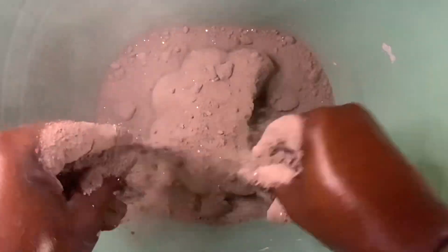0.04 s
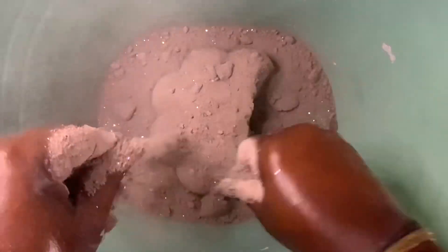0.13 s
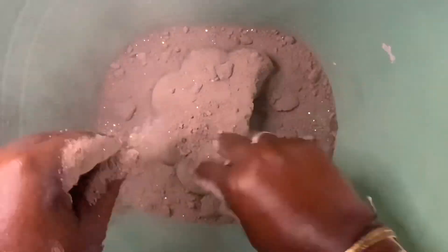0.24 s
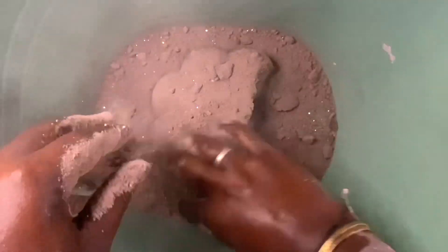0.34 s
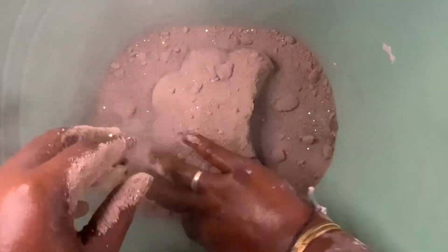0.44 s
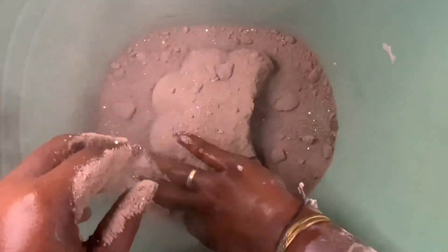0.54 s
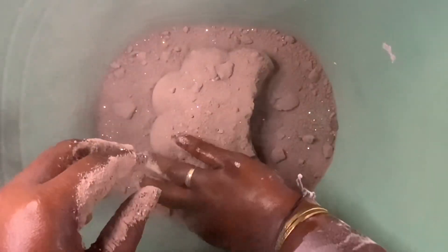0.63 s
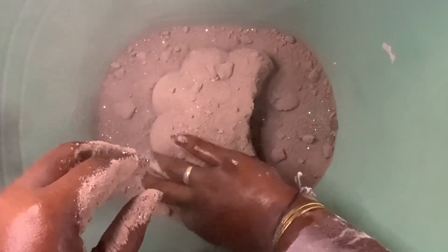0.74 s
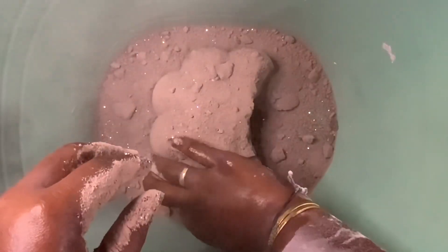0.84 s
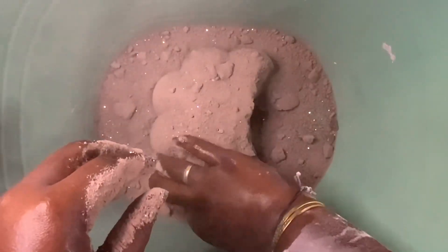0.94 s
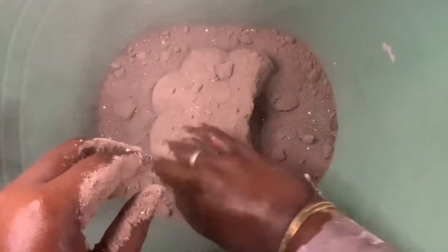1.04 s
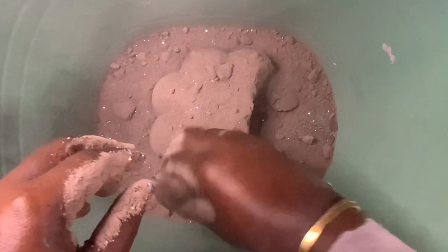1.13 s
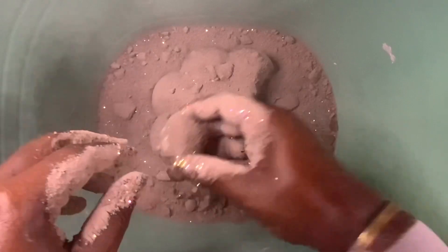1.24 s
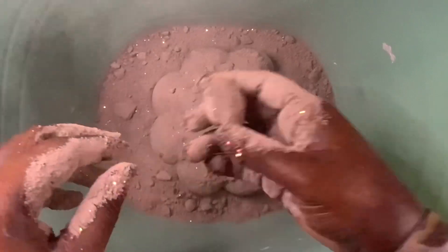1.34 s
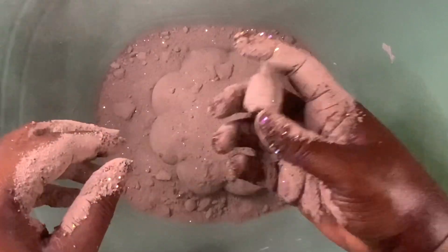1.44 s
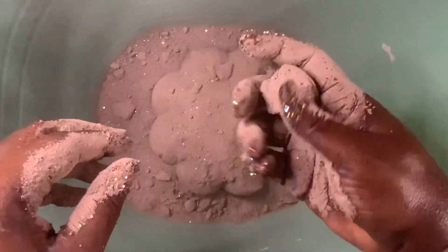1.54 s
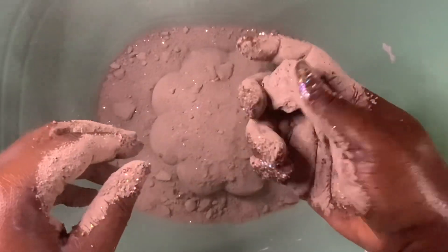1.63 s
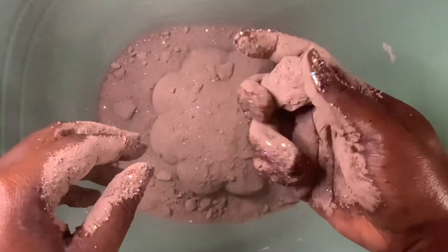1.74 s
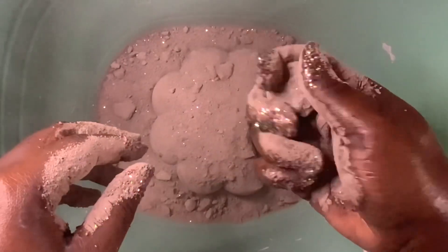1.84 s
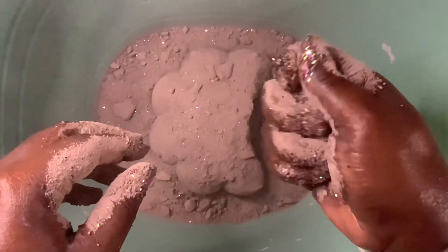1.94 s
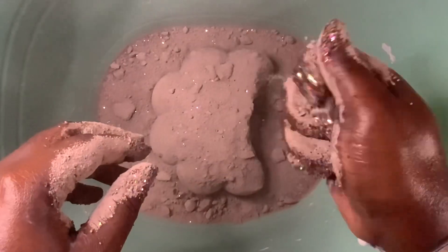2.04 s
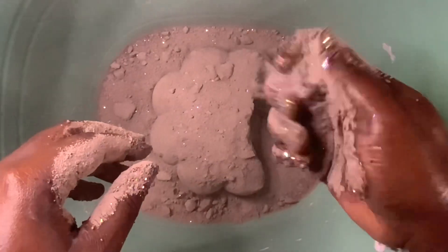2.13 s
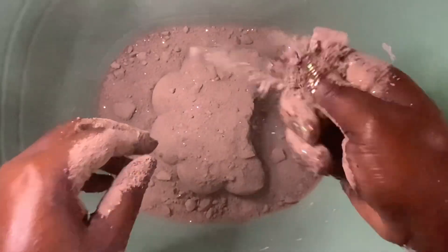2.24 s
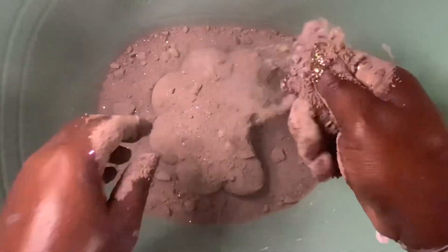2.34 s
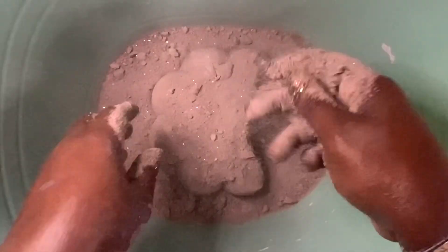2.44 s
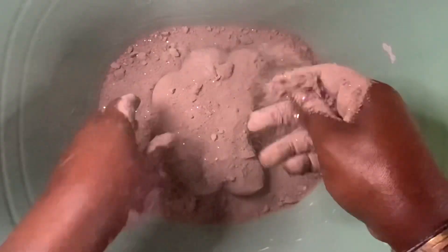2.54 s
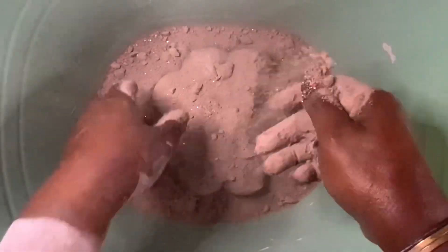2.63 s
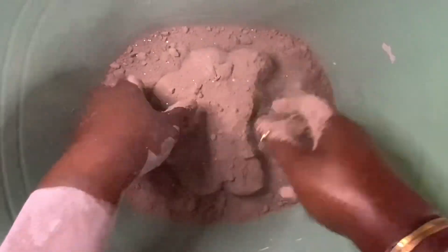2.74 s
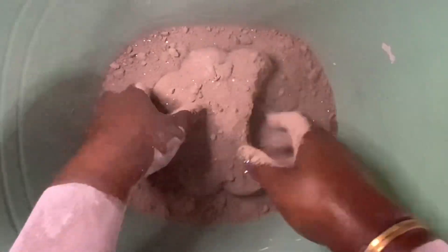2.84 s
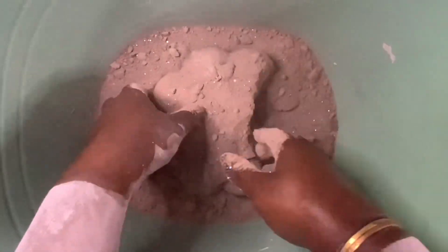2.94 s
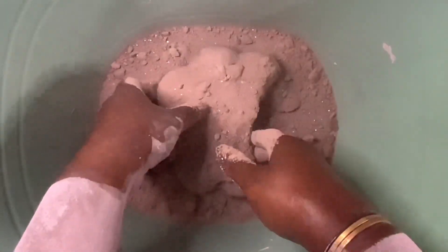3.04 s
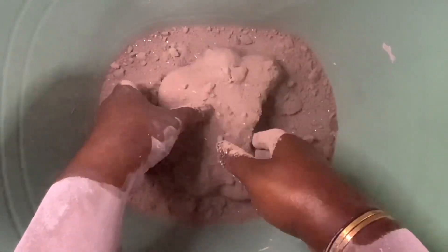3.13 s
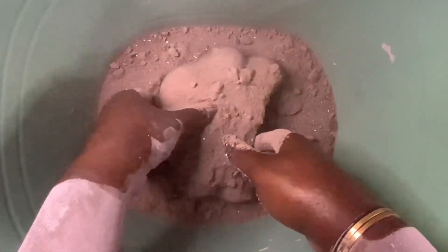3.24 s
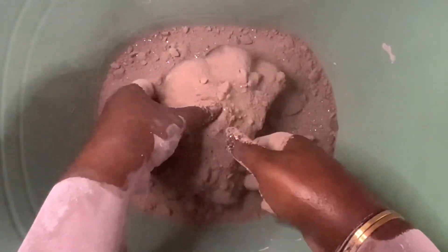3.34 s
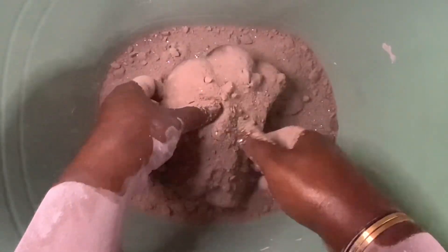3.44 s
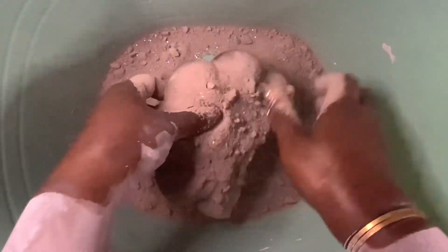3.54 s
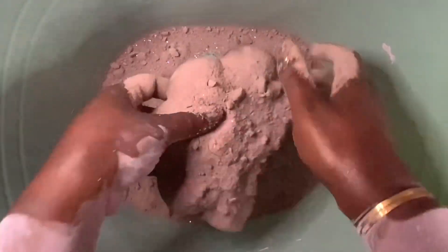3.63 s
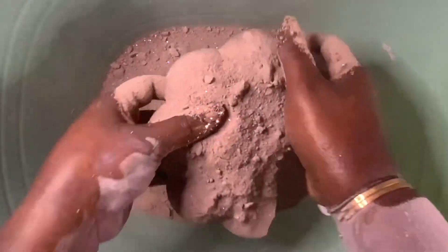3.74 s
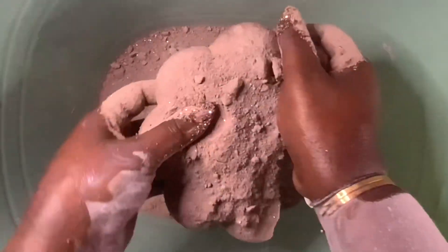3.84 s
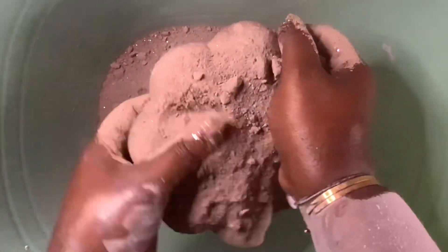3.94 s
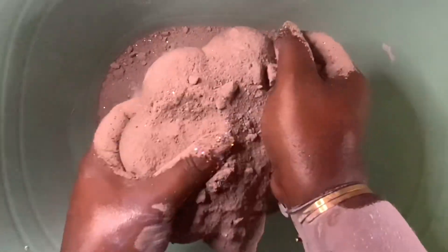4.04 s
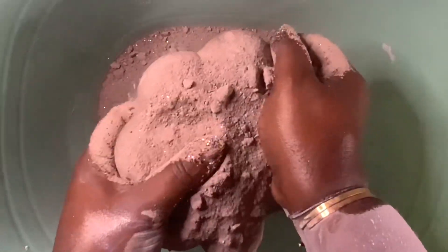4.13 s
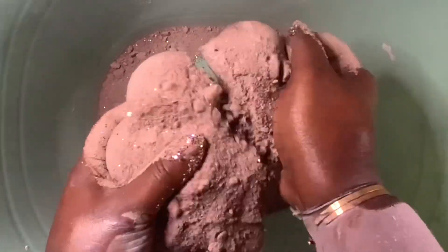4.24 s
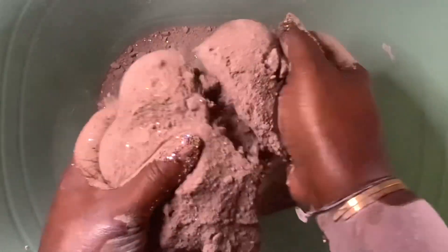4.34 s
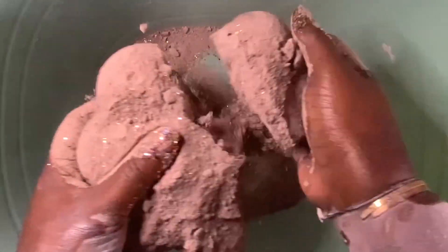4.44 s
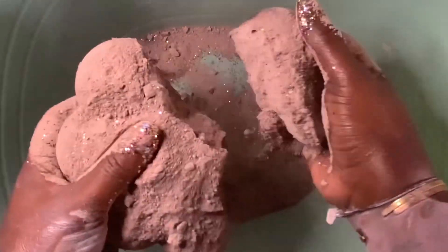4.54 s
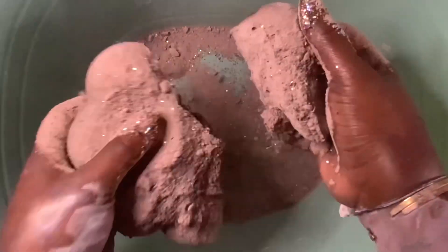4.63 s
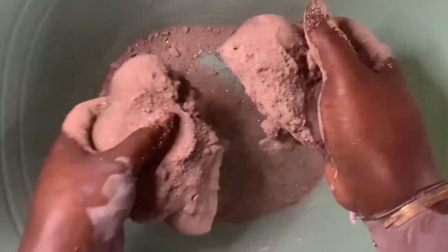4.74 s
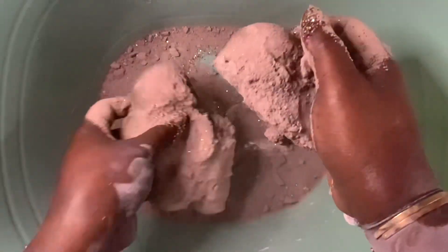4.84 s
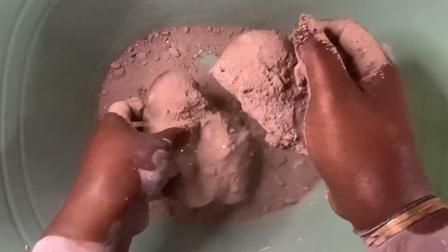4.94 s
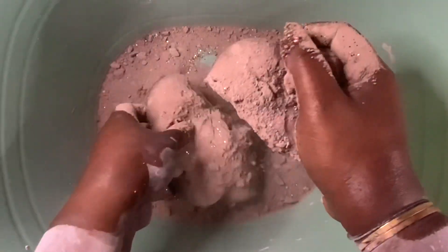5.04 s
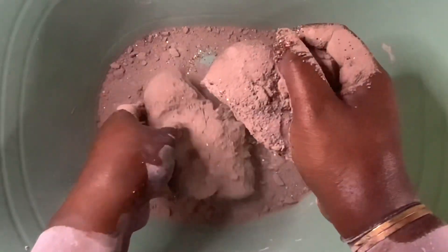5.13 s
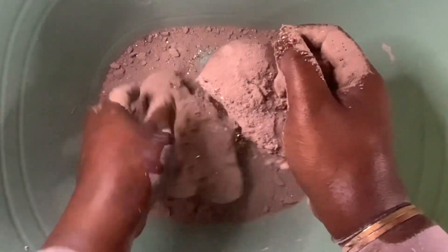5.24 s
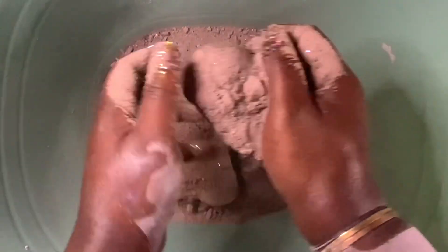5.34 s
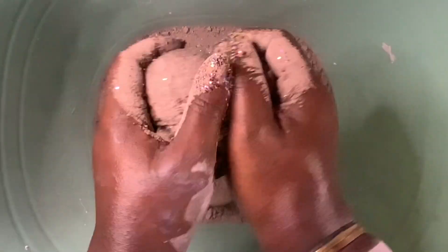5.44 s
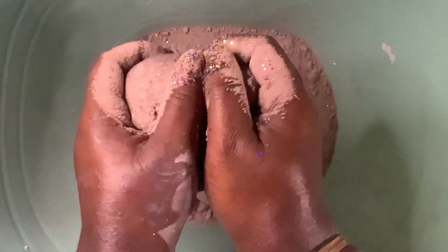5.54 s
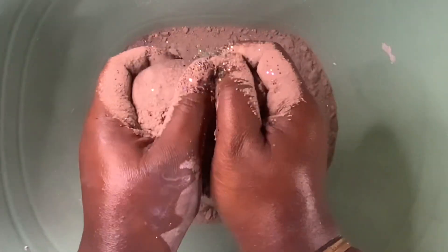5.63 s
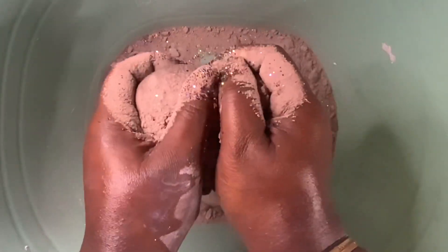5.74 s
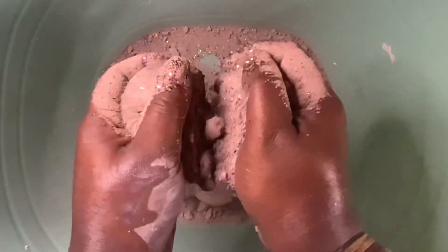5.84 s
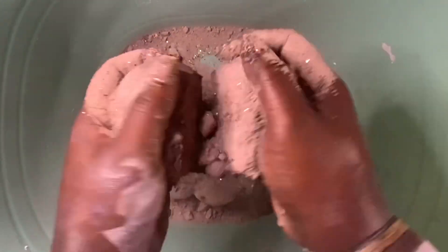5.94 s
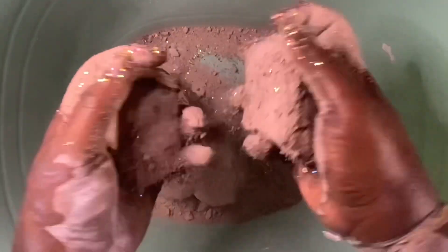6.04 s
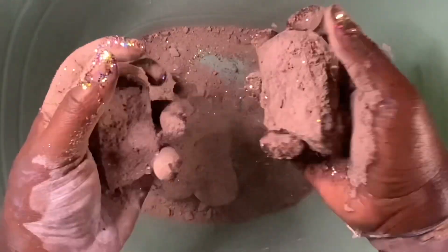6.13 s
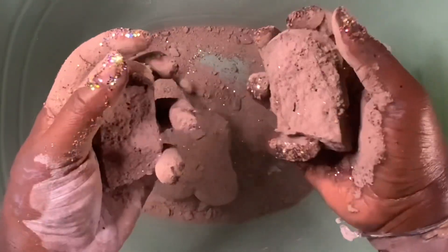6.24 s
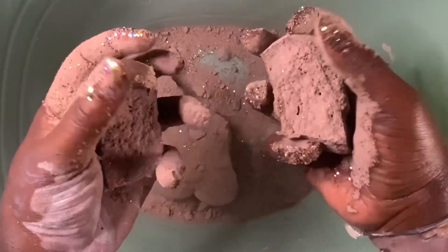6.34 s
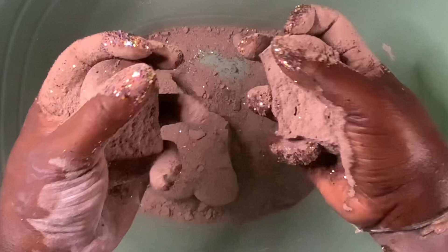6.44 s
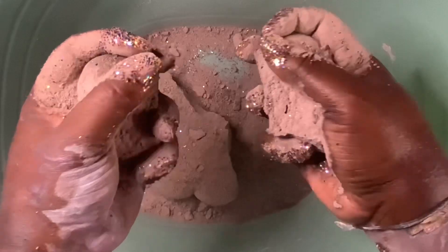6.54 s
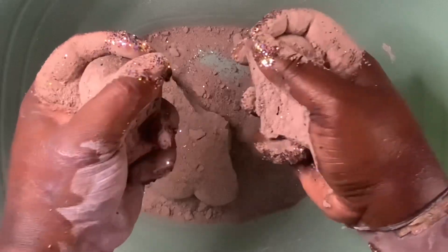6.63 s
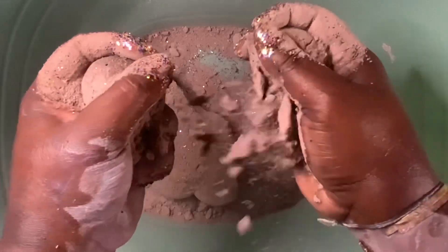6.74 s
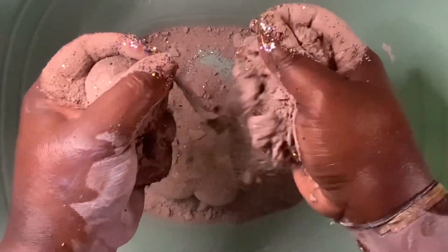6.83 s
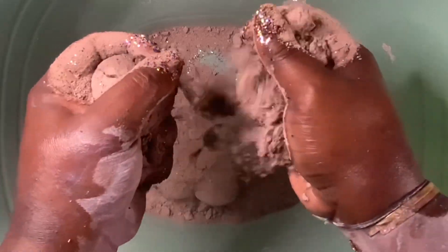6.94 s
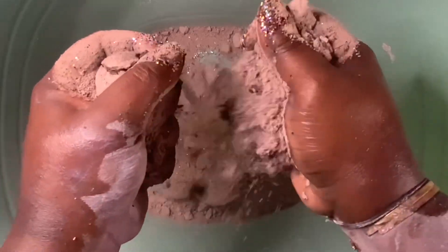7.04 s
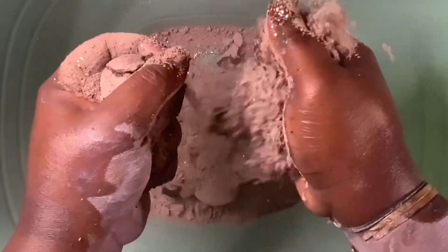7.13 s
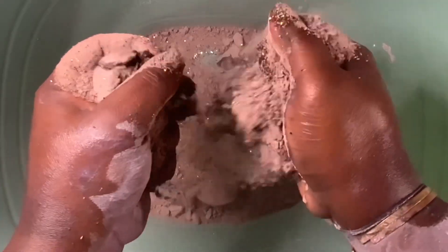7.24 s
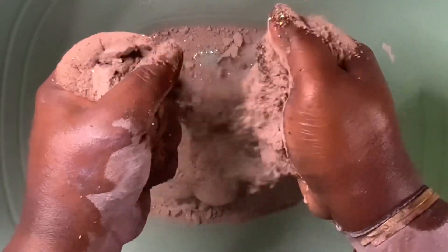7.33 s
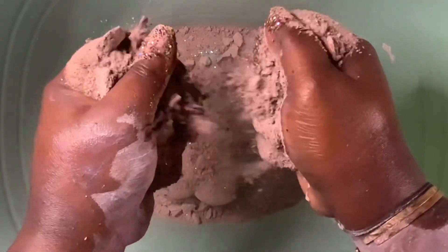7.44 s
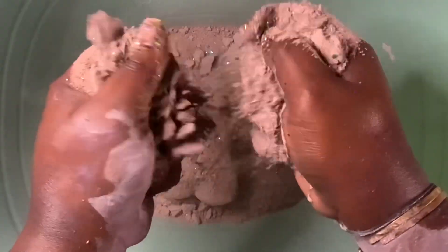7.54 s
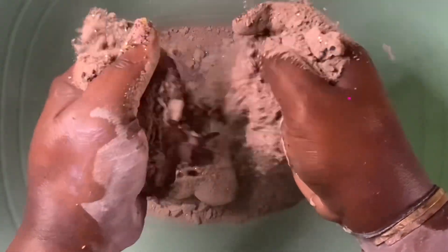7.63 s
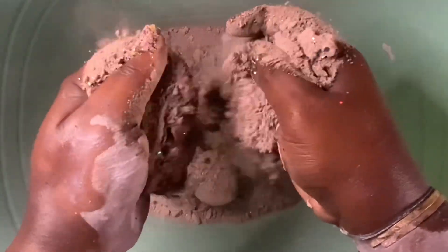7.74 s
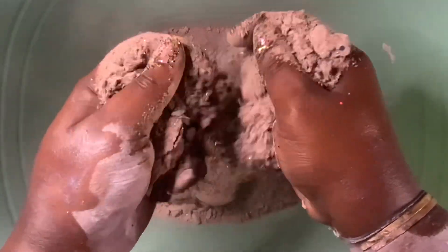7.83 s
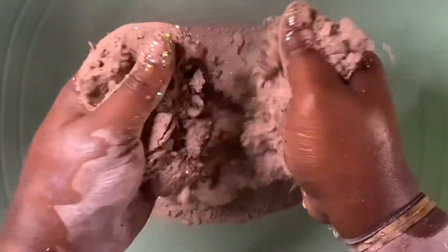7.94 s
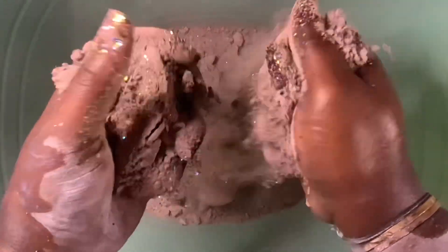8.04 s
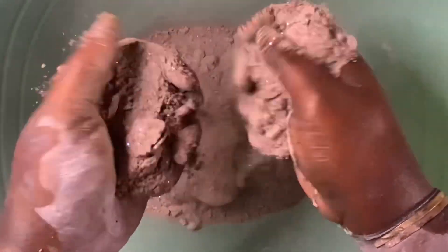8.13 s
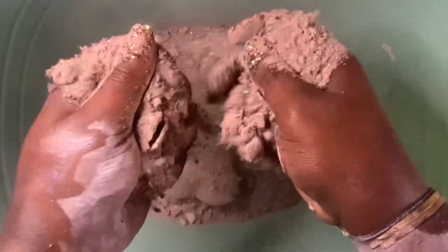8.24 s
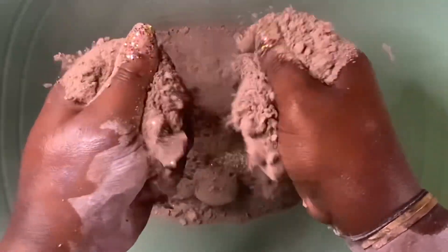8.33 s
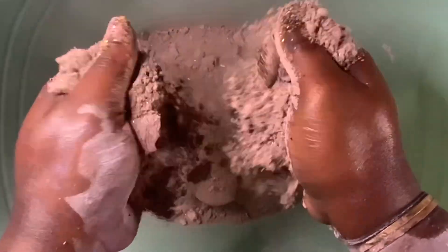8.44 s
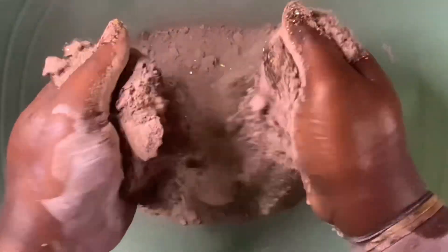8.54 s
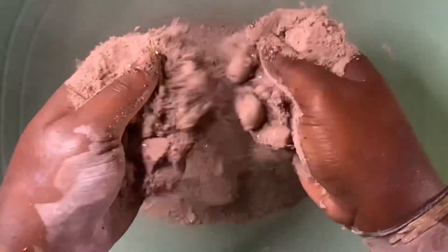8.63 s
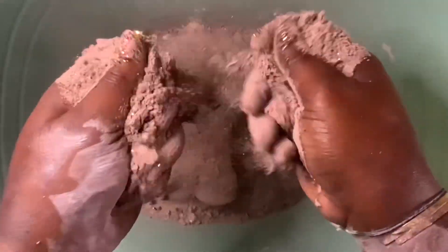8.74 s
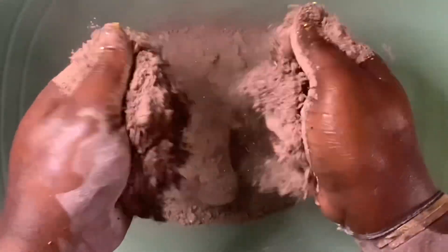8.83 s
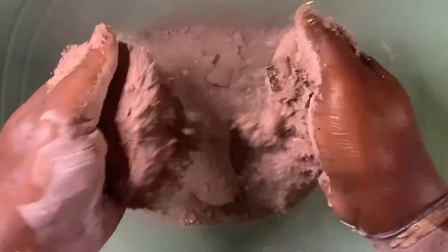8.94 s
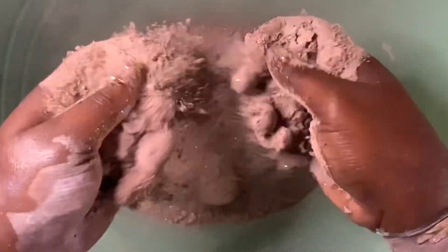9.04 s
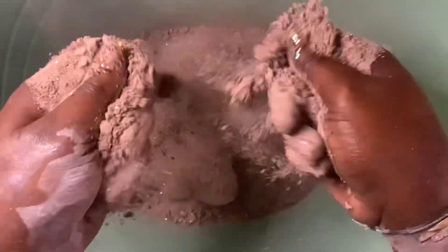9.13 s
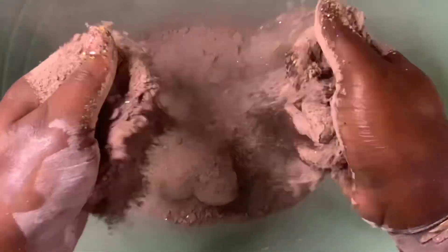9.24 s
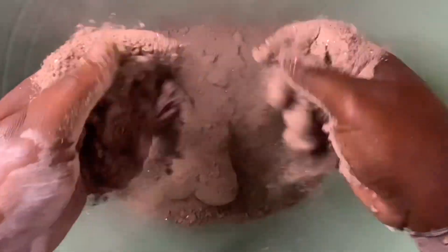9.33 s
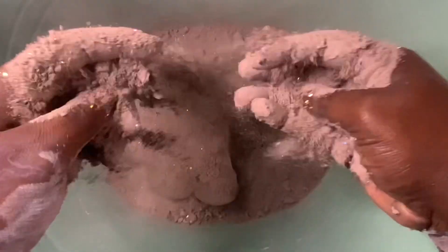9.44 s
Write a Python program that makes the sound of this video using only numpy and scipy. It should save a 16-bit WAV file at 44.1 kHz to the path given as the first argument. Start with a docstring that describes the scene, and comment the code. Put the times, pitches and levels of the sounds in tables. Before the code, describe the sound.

Close stereo microphones in a small room with a faint appliance hum. Light gritty crumbling and finger rubs give way to near silence, then isolated brittle snaps. The dry lump breaks with hard, hollow cracks, pieces thud softly into powder in a plastic basin, and finally both hands crush the chunks in rapid crunches, with crumbs pattering and fine dust hissing.

```python
"""Breaking and crushing chalk

Two hands break and crush a dry chalk block over a plastic basin, close to a pair of microphones.
Fractures and chips are short noise bursts rung at the pitch of the piece; lumps knock the powder bed softly.
Grit, crumbs, powder and dust are crowds of random grains, driven by the grip, the squeezes and the debris.
A small room answers with a short decaying tail, and an appliance hums faintly over a low rumble."""
import sys
import numpy as np
from scipy import signal
from scipy.fft import rfft, irfft, next_fast_len
from scipy.io import wavfile
from scipy.ndimage import uniform_filter1d, map_coordinates

SR = 44100
rng = np.random.default_rng(int(sys.argv[2]) if len(sys.argv) > 2 else 0)


def generate_wav(signal):
    """Clip the signal to [-1, 1] and save it as 16-bit WAV at the path in sys.argv[1]."""
    frames = np.transpose(np.atleast_2d(signal))
    scaled = np.clip(frames, -1, 1) * 32767
    pcm = np.round(scaled).astype(np.int16)
    wavfile.write(sys.argv[1], SR, pcm)


N = 418509

# fractures, levels ahead of echoes and placement: (time [s], crack level over SNAP_SPAN_S [dB],
# crack pitch [Hz], brightness of the tick [dB re crack], thud of the loosened piece [dB re crack])
FRACTURES = [(0.0277, -31, 1980, 5.5, -21), (0.1572, -36.5, 2450, -4, -27), (0.208, -32, 2100, -33, -18),
             (0.3776, -25.5, 1190, -4, -12), (0.394, -28.5, 2600, 4, -7), (0.4306, -23.5, 2370, 0.5, -8.5),
             (0.4852, -34, 2840, -23, -20), (0.6339, -34, 2100, -8, -4), (2.2765, -19, 2650, -7, -20),
             (2.426, -34.5, 1650, 3.5, -6.5), (2.5658, -34.5, 1680, -7, -5),
             (2.7947, -20, 2540, -10, -13.5), (3.3639, -33, 1730, 2, -6), (3.501, -30, 1730, -40, -20),
             (3.6972, -43.5, 2750, 11, -24), (4.3729, -13.5, 1380, -16, -5.5), (4.378, -8, 1970, -3, -48),
             (4.4982, -7.5, 1610, -22, -12), (4.523, -13, 1700, -3.5, -11.5),
             (4.657, -29.5, 2300, 7.5, -38), (4.87, -31.5, 1740, -10, -15), (4.9162, -27.5, 1570, -8, -5),
             (4.9757, -28, 1350, -6, -7), (5.0154, -33.5, 2150, 2, -7), (5.273, -27.5, 1540, -10, -12),
             (5.672, -32.5, 2070, -29, -31), (5.792, -42, 2200, 16.5, 2), (6.054, -33, 2800, -5, -19),
             (6.2635, -20, 1450, -15, -5), (6.4075, -36, 1930, -23, -33), (6.849, -44, 3000, 16.5, 5.5),
             (6.8753, -15.5, 2100, -7.5, -14), (6.9423, -35.5, 2440, 11, 1.5),
             (7.0301, -13.5, 2070, -10, -15), (7.0412, -13.5, 2250, -11, -10.5),
             (7.1209, -24, 1280, -8, -3.5), (7.1303, -10.5, 2430, -11, -34), (7.2977, -17, 1410, -24, -16),
             (7.3112, -18.5, 1680, -19, -6.5), (7.5128, -36.5, 2870, 19, -9),
             (7.5307, -20.5, 1220, -2, -21), (7.582, -22, 3400, -2, -16), (7.6825, -28, 1310, -5, -15),
             (7.7328, -5.5, 2650, -19, -22), (7.7468, -9.5, 2550, -6, -14.5),
             (7.778, -13.5, 2330, -15, -16), (7.952, -29, 1870, -28.5, -29), (8.287, -26, 1100, -2.5, -9),
             (8.3642, -26, 2440, -12, -12), (8.4038, -30.5, 2120, -17, -28), (8.47, -32, 1940, 10.5, -14),
             (8.6518, -20.5, 2280, -9, -6.5), (8.6832, -26, 1540, -8, -8), (8.9613, -31.5, 2740, 1, -8),
             (9.0423, -31.5, 2860, -18, -19)]
# colour of crushed grit: (frequency [Hz], relative level [dB])
GRIT_COLOUR = [(300, -32), (700, 5.5), (950, 14), (1200, 7), (1430, 5.5), (1750, 5.5), (2200, 6.5),
               (2850, -2.5), (3600, -0.5), (4800, -12.5), (8000, -14), (16000, -59)]
# colour of the bright tick on a break: (frequency [Hz], relative level [dB])
TICK_COLOUR = [(1500, -2), (4000, 2.5), (6200, 4.5), (7600, 7), (9400, -6.5), (12000, 0.5), (15800, -11)]
# the times over which the levels of breaks and thuds count
SNAP_SPAN_S, THUD_SPAN_S = 0.005, 0.02


def snaps():
    """Each fracture rings briefly at the pitch of its piece, under a bright tick."""
    # the breaking point moves sideways: (time [s], left channel gain ahead of the microphones [dB])
    break_side = [(0, -1.5), (2.3, 0.5), (3.5, 1.5), (4.5, 1.5), (6.2, -2), (7.3, -0.5), (7.74, -4),
                  (8.1, -1)]
    track = np.zeros((2, N))
    for s, db, hz, tick_db, _ in FRACTURES:
        def body(f):
            ring = np.abs(resonance(f, hz, 1.36 * hz)) ** 3.3
            return causal(basin(f) ** 0.92 * piece(f, ripple_db=1.5) * ring)

        crack = sized(filtered(burst(t60=0.011, scatter=2.8), body), db, SNAP_SPAN_S)
        tick = sized(coloured(burst(t60=0.017, scatter=7.0), TICK_COLOUR), db + tick_db, SNAP_SPAN_S)
        # every tick is mixed in 7 dB below its brightness setting
        snap = reflected(crack + amp(-7.0) * tick, near_db=-22.0, near_t60=0.054, room_db=-11.0)
        left_db = np.interp(s, *np.transpose(break_side))
        add(track, s, snap * amp([[left_db], [0]]))
    return track


def chips():
    """A small chip clicks at its own pitch, with a short bright tick."""
    # chips between the fractures, levels ahead of echoes:
    # (time [s], click level over SNAP_SPAN_S [dB], pitch [Hz], bright tick [dB re click])
    chip_events = [(0.01, -44, 2640, -15), (0.113, -42.5, 5000, -13), (0.128, -39, 2800, -20),
                   (0.194, -41, 2520, -44), (0.323, -44, 5330, -20), (0.348, -42, 2400, -7),
                   (0.417, -31, 2800, -9), (0.521, -40, 4370, -24), (0.5315, -38.5, 2310, -16),
                   (2.446, -36, 2830, -27), (2.598, -41, 4960, -12), (2.7, -41.5, 3360, -25),
                   (3.088, -38, 1500, -28), (3.719, -41.5, 4500, -14), (4.393, -35, 2200, -9),
                   (4.399, -33, 2400, -8), (4.41, -41, 3200, -6), (4.421, -35, 1900, -8),
                   (4.467, -43, 2400, 1), (4.535, -29, 2100, -6), (4.546, -29, 1900, -11),
                   (4.573, -41, 2450, -14), (4.584, -39, 2000, -8), (4.627, -34, 2150, -11),
                   (4.6497, -44.5, 4500, 2), (4.756, -44, 2980, 1), (4.818, -46, 5000, 4.5),
                   (5.088, -38.5, 1570, -26), (5.488, -47, 3100, -13), (5.658, -42.5, 2130, -10),
                   (6.077, -40, 2360, -4), (6.256, -45, 2000, 0), (6.38, -53, 2400, -8),
                   (6.422, -47, 2300, -8), (6.458, -44, 3470, -25), (6.466, -38.5, 2270, -24),
                   (6.676, -45.5, 5340, -17), (6.76, -44.5, 7040, -7), (6.816, -39, 5550, -16),
                   (6.908, -39, 2200, 1), (7.013, -44, 2300, 4), (7.063, -36, 2620, -23),
                   (7.274, -35, 2190, -7), (7.32, -33, 2900, -18), (7.343, -39, 2700, -14),
                   (7.376, -41.5, 6000, 4), (7.563, -44, 2970, 8), (7.718, -31, 2880, -4),
                   (7.853, -33.5, 2340, -19), (7.9096, -40, 5550, -10), (7.978, -45, 6700, -21),
                   (8.006, -39.5, 2450, -15), (8.073, -40, 2300, -1.5), (8.184, -38, 2340, -28),
                   (8.209, -45, 2400, -13), (8.243, -39, 2900, -20), (8.258, -35, 4060, -26),
                   (8.316, -50, 2900, 3.5), (8.349, -38, 2900, -2), (8.448, -47, 6860, -23),
                   (8.635, -31, 2200, -23), (8.938, -35, 2280, -24), (9.026, -37, 2400, -19),
                   (9.093, -44, 2730, -17), (9.142, -42.5, 7100, -9), (9.235, -40, 6440, -21),
                   (9.268, -36.5, 2400, -14), (9.306, -44, 6000, -8), (9.317, -37.5, 2440, -18),
                   (9.346, -42, 5770, -22)]
    track = np.zeros((1, N))
    for s, db, hz, tick_db in chip_events:
        def body(f):
            ring = np.abs(resonance(f, hz, 0.54 * hz)) ** 1.33
            return causal(basin(f) * piece(f, ripple_db=4.0) * ring)

        click = sized(filtered(burst(t60=0.013, scatter=2.4), body), db, SNAP_SPAN_S)
        tick = sized(coloured(burst(t60=0.0089, scatter=3.9), TICK_COLOUR), db + tick_db, SNAP_SPAN_S)
        add(track, s, (click + tick)[None])
    return reflected(track[0], near_db=-11.5, near_t60=0.016, room_db=-10.0)


def thuds():
    """Every fracture knocks a piece loose, and lumps land in the powder bed."""
    # lumps landing in the basin, levels ahead of echoes:
    # (time [s], level over THUD_SPAN_S [dB], pitch [Hz], crushed grit [dB re knock])
    landings = [(0.381, -37.5, 200, -20), (0.417, -36.5, 424, -4), (0.635, -28, 490, -33),
                (0.662, -34.5, 470, -18), (0.975, -28.5, 356, -21), (1, -33.5, 330, -24),
                (1.045, -42, 400, -11), (1.083, -33.5, 474, -21.5), (2.294, -34.5, 427, -2.5),
                (2.606, -37, 453, -11), (2.821, -31, 220, -5), (3.088, -43.5, 398, -4),
                (3.189, -36, 308, -15), (3.379, -39, 216, -14), (4.381, -19, 416, -9),
                (4.503, -17, 386, -13), (4.578, -33, 400, -22), (4.631, -34.5, 357, -13),
                (4.811, -32, 384, -5.5), (4.985, -31.5, 313, -20), (5.248, -31.5, 300, -12.5),
                (5.264, -20, 240, -19), (5.271, -28.5, 480, -17), (5.299, -25.5, 460, -17.5),
                (5.348, -34.5, 326, -12), (5.39, -34.5, 390, -7.5), (6.331, -37.5, 533, -14),
                (6.862, -40, 383, -5), (7.059, -25.5, 443, -3), (7.122, -14.5, 570, -9.5),
                (7.127, -24.5, 770, -5), (7.312, -22, 417, -23), (7.462, -38.5, 343, -7),
                (7.568, -34, 760, -14), (7.706, -31, 476, -14), (7.797, -36, 360, -16),
                (8.119, -40, 450, -7), (8.136, -32.5, 510, -7), (8.157, -29.5, 367, -12.5),
                (8.299, -33.5, 480, -20), (8.451, -32, 320, -8), (8.546, -34.5, 380, -7),
                (8.783, -32.5, 404, -11)]
    lag_s = 0.001534
    track = np.zeros((2, N))
    for s, db, _, _, thud_db in FRACTURES:
        weight_db = db + thud_db
        # the harder, the higher: 466 Hz at -25 dB, an octave more for every 58 dB
        hz = 466 * 2 ** ((weight_db + 25) / 58)
        add(track, s + lag_s, thud(weight_db, hz, grit_db=-8.5))
    for s, db, hz, grit_db in landings:
        add(track, s, thud(db, hz, grit_db))
    return track


def thud(db, hz, grit_db):
    """A soft contact knocks at its lump's pitch and crushes a little grit; each one echoes differently."""
    def body(f):
        # a soft contact passes little above its own pitch, a small lump little below it
        contact = np.abs(resonance(f, hz, 0.89 * hz)) ** 2.08 / np.sqrt(1 + (f / (2.06 * hz)) ** 4)
        return causal(basin(f) ** 1.11 * piece(f, ripple_db=1.5) * contact)

    knock = unit(filtered(burst(t60=0.031, scatter=2.74), body))
    crunch = unit(coloured(burst(t60=0.016, scatter=9.8), GRIT_COLOUR))
    blow = sized(knock + amp(grit_db) * crunch, db, THUD_SPAN_S)
    return reflected(blow, near_db=-9.5, near_t60=0.053, room_db=-7.5)


def bumps():
    """The floor of the basin flexes under a weight and swings for a few cycles."""
    # flexings of the floor: (time [s], peak level at the right microphone [dB], pitch [Hz])
    floor_bumps = [(1.004, -34.5, 78), (2.814, -32.5, 182), (3.163, -35.5, 91), (3.372, -36.5, 64),
                   (4.371, -18, 206), (4.5, -34.5, 89), (4.988, -33, 59), (5.257, -25.5, 97.5),
                   (5.268, -25, 174), (5.303, -32, 74.5), (5.352, -31, 82), (5.79, -27, 188),
                   (7.037, -26.5, 155), (7.042, -29, 90), (8.787, -34, 79.5)]
    track = np.zeros((1, N))
    t = np.arange(SR // 3) / SR
    for s, db, hz in floor_bumps:
        cycles = hz * t
        swing = np.sin(2 * np.pi * cycles) * amp(-6.0 * cycles) * (1 - np.exp(-cycles / 2))
        add(track, s, amp(db) * swing[None] / swing.max())
    return track


def crumbling():
    """Crumbs patter, grit breaks under the fingers, specks tick, splinters crack and fine powder slides."""
    # colour of pattering crumbs: (frequency [Hz], relative level [dB])
    patter_colour = [(25, -51), (70, -6), (150, -4), (240, -0.5), (325, 3.5), (400, -5.5), (490, 0),
                     (610, -8), (900, -13), (1200, -12.5), (3000, -53)]
    # colour of sliding powder and its specks: (frequency [Hz], relative level [dB])
    powder_colour = [(1000, -14), (3000, 2.5), (5000, 0), (6500, 1.5), (7500, 3.5), (9300, -5),
                     (12000, -3.5), (15800, -10)]
    crumb_flow, grit_flow, powder_flow = flow()
    crumbs = grains(rate=260, spread_db=1.0, clump_db=-1.5, smooth=0.41)
    patter = unit(coloured(crumbs, patter_colour))
    crunches = grains(rate=300, spread_db=3.5, clump_db=4.0, smooth=0.41)
    grit = patchy(coloured(crunches, GRIT_COLOUR), depth_db=5.5)
    hiss = grains(rate=530, spread_db=-2.0, clump_db=3.5, smooth=1.0)
    powder = patchy(coloured(hiss, powder_colour), depth_db=1.4)
    specks = patchy(coloured(flakes(rate=90, t60=0.003), powder_colour), depth_db=3)
    # specks and splinters fly off where both grit and powder are on the move
    stress = np.sqrt(grit_flow * powder_flow)
    # the hardest squeezes pulverise the chalk, so the stress levels off at -42.5 dB
    stress = stress / np.hypot(1, stress / amp(-42.5))
    # splitting grows faster than the stress: 1.41 dB per dB, equal to it at the reference
    reference = amp(-35)
    splitting = reference * (stress / reference) ** 1.41
    flying = splitting * (amp(-7) * specks + amp(-8.5) * splinters())
    mix = amp(1) * crumb_flow * patter + amp(-2.5) * grit_flow * grit + amp(-6.5) * powder_flow * powder
    return reflected(mix + flying + rubs(), near_db=-4.5, near_t60=0.015, room_db=-9.5)


def flow():
    """Gains of crumbs, grit and powder: powers of steady grip, squeezes, strain and fracture debris add."""
    # steady working of the hands; fineness above 0 gives more powder, below 0 more crumbs:
    # (time [s], effort [dB], fineness [dB])
    grip = [(0, -45.5, 1.5), (0.27, -55, -0.5), (0.45, -48.5, 5), (0.72, -57, -5), (0.9, -58, -4),
            (1.25, -68, -7.5), (1.8, -74.5, 8), (2.5, -51, 2), (2.92, -51.5, -2.5), (3.25, -47, 0.5),
            (3.62, -63, -1.5), (4.02, -65, 4), (4.8, -50, 3.5), (5.199, -51, -4.5), (5.552, -62, 4.5),
            (5.92, -67.5, 9.5), (6.1, -51, 3), (6.621, -62, 0), (6.95, -46, 0), (9.49, -50, 0)]
    # single squeezes that make the chalk give way: (time [s], length [s], effort [dB], fineness [dB])
    squeezes = [(0.025, 0.14, -50, 2), (0.37, 0.06, -40, 3), (0.927, 0.15, -56, -9), (1.203, 0.012, -54, 3),
                (1.856, 0.038, -57.5, 13), (2.024, 0.034, -62.5, 8), (2.549, 0.061, -51, 11.5),
                (2.972, 0.066, -55.5, -11), (3.643, 0.14, -61, 9), (4.081, 0.061, -56.5, 7),
                (4.175, 0.007, -40, 5), (4.265, 0.043, -62.5, 14.5), (4.383, 0.19, -38.5, 4.5),
                (4.975, 0.025, -46, 7.5), (5.225, 0.043, -40, -3), (5.269, 0.13, -52, -17),
                (5.804, 0.058, -65, 15.5), (5.968, 0.081, -56, 8), (6.327, 0.21, -50, -2.5),
                (6.638, 0.51, -67.5, 18), (7.546, 0.033, -40.5, -5.5), (8.04, 0.35, -51, -4.5),
                (8.569, 0.045, -42, -2), (8.765, 0.025, -37.5, -2.5), (8.912, 0.11, -44, -0.5),
                (9.308, 0.065, -46, -1)]

    def shares(db, fine_db):
        return amp(np.reshape([db - fine_db, db, db + fine_db], (3, -1)))

    s, *columns = np.transpose(grip)
    effort_db, fineness_db = [np.interp(np.arange(N) / SR, s, column) for column in columns]
    power = shares(effort_db, fineness_db) ** 2
    for s, length, db, fine_db in squeezes:
        add(power, s, (shares(db, fine_db) * swell(length, attack=0.014, t60=0.14)) ** 2)
    trail = swell(0.0016, attack=0.0016, t60=0.35)
    # the chalk grinds for a moment before it breaks
    strain_s, strain_db = 0.0071, -33.5
    strain = swell(strain_s, strain_s, strain_s)
    for s, db, _, tick_db, thud_db in FRACTURES:
        # crumbs follow the thud, grit the crack, powder the mean of crack and tick brightness
        debris = amp(db) * amp([[thud_db - 35], [-15.5], [tick_db / 2 - 20]])
        add(power, s - strain_s, (shares(db + strain_db, 0) * strain) ** 2)
        add(power, s, (debris * trail) ** 2)
    return np.sqrt(power)


def splinters():
    """Large, middling and small splinters crack independently, each size at its own pitch; rms 1."""
    # pitches of large, middling and small splinters: [Hz]
    splinter_hz = [2100, 2650, 3400]

    def crack(hz):
        def ring(f):
            return causal(basin(f) * np.abs(resonance(f, hz, 0.7 * hz)) ** 2)
        return filtered(flakes(rate=20, t60=0.003), ring)

    return patchy(sum(crack(hz) for hz in splinter_hz), depth_db=4)


def rubs():
    """Each short slide of a finger swells as the pressure builds: a dense, rough scrape."""
    # slides of the fingers over the chalk: (time [s], length [s], level at full pressure ahead of echoes [dB])
    slides = [(0.575, 0.055, -49), (0.867, 0.063, -52), (0.756, 0.058, -39), (0.935, 0.1, -41.5),
              (1.86, 0.016, -66), (2.556, 0.064, -39.5), (2.963, 0.11, -42), (3.124, 0.089, -48.5),
              (4.976, 0.022, -32.5), (7.023, 0.074, -40), (8.11, 0.049, -40.5), (8.284, 0.13, -66),
              (8.655, 0.049, -40), (8.75, 0.024, -49)]
    # colour of the scrape: (frequency [Hz], relative level [dB])
    scrape_colour = [(300, -6), (900, 7.5), (1500, 11.5), (2700, 2), (4200, -1), (6500, -3.5), (8000, -6),
                     (10000, -15), (15800, -25)]
    t = np.arange(N) / SR
    pressure = np.zeros(N)
    for s, length, db in slides:
        rise = (t - s) / (0.31 * length)
        release = (s + length - t) / 0.011
        pressure += amp(db) * np.clip(np.minimum(rise, release), 0, 1)
    scrape = grains(rate=1100, spread_db=4.0, clump_db=0.5, smooth=0.82)
    return pressure * unit(coloured(scrape, scrape_colour))


def dust():
    """Falling dust is a bright, fine crackle of very many grains."""
    # dust streaming down, mean level ahead of echoes: (time [s], level [dB])
    dust_fall = [(0, -83), (5.2, -93), (5.65, -81), (6.05, -57.5), (6.55, -86), (6.85, -50), (7.25, -48.5),
                 (7.6, -50), (7.85, -49.5), (8.15, -52.5), (8.55, -48.5), (8.87, -57.5), (9.0, -50),
                 (9.25, -52), (9.49, -55)]
    # colour of the dust: (frequency [Hz], relative level [dB])
    dust_colour = [(2000, -40), (4000, -8), (6500, -5), (7700, -1.5), (9200, -7), (11400, -4.5),
                   (13500, -7.5), (15800, -8)]
    level_db = np.interp(np.arange(N) / SR, *np.transpose(dust_fall)) + 2.3 * wobble(18)
    fine = grains(rate=1100, spread_db=5, clump_db=1.8, smooth=0.45)
    crackle = patchy(coloured(fine, dust_colour), depth_db=2.6)
    return reflected(amp(level_db) * crackle, near_db=-19, near_t60=0.012, room_db=-9.5)


def background():
    """A slightly unsteady appliance hum over the low, uneven rumble of the room."""
    # tones of the hum: (frequency [Hz], central rms level at the right microphone [dB])
    hum_tones = [(90, -65), (150.3, -50.5), (279.5, -60.5), (538, -72)]
    # colour of the room's noise: (frequency [Hz], relative level [dB])
    air_colour = [(20, -31), (45, -29.5), (85, 0.5), (130, 0.5), (210, -3), (300, -8.5), (400, -13.5),
                  (560, -18.5), (720, -16.5), (1000, -23), (1800, -47.5), (4000, -48), (7500, -51),
                  (15800, -48)]
    # gain of the left channel's noise ahead of the microphones: (frequency [Hz], gain [dB])
    air_left = [(300, 0), (700, 2), (1000, 8.5), (3000, 21), (6000, 9.5), (12000, -2)]
    t = np.arange(N) / SR
    hum = np.zeros(N)
    for hz, db in hum_tones:
        tone = np.sin(2 * np.pi * hz * t + 0.4 * wobble(30))
        hum += amp(db + 1.2 * wobble(7.8)) * np.sqrt(2) * tone
    air = amp(-52.5 + 2.5 * wobble(7)) * unit(coloured(rng.standard_normal(N), air_colour))
    left_air = filtered(air, lambda f: amp(along(air_left, f)))
    return hum + np.array([left_air, air])


def basin(f):
    """Gain of the resonances of the basin and the cupped hands."""
    # resonances: (frequency [Hz], width [Hz], peak gain of each alone [dB])
    basin_modes = [(122.4, 125, 21.5), (216, 184, 4.5), (322, 82, 11), (490, 146, 3.5), (836, 850, 12),
                   (1450, 440, 9), (2350, 330, 4), (2880, 95, 2)]
    return amp(sum(db * np.abs(resonance(f, hz, width)) ** 2 for hz, width, db in basin_modes))


def piece(f, ripple_db):
    """Every piece of chalk has its own uneven set of resonances."""
    knots = np.geomspace(200, 8000, num=44)
    return amp(ripple_db * np.interp(f, knots, rng.standard_normal(len(knots))))


def reflected(x, near_db, near_t60, room_db):
    """x in two channels, with quick echoes from the basin's wall and the room's longer tail."""
    # decay of the room: (frequency [Hz], time to fall by 60 dB [s])
    room_t60 = [(100, 0.22), (500, 0.2), (2500, 0.18), (7000, 0.16), (15000, 0.034)]
    hz, t, z = signal.stft(rng.standard_normal((3, SR // 5)), SR, nperseg=256)
    # long waves reach both microphones alike, short ones differently
    apart = (hz / (hz + 900))[:, None]
    z = np.sqrt(1 - apart ** 2) * z[2] + apart * z[:2]
    decay = amp(-60 * t / along(room_t60, hz)[:, None])
    tail = signal.istft(z * decay, SR, nperseg=256)[1]
    t = np.arange(tail.shape[1]) / SR
    near = rng.standard_normal(len(t)) * amp(-60 * t / near_t60)
    echoes = amp(near_db) * near / np.linalg.norm(near) + amp(room_db) * tail / np.linalg.norm(tail[0])
    # the echoes fade in over 0.91 ms
    echoes = echoes * np.clip(t / 0.00091, 0, 1)
    x = np.pad(x, (0, SR // 5))[:N]
    return x + signal.fftconvolve(x[None], echoes, axes=1)[:, :len(x)]


def burst(t60, scatter):
    """One sharp break with a dying spray of smaller ones."""
    t = np.arange(SR // 10) / SR
    spray = rng.standard_normal(len(t)) * amp(-60 * t / t60)
    return (t == 0) + scatter * spray / np.linalg.norm(spray)


def grains(rate, spread_db, clump_db, smooth):
    """Tiny breaks of uneven size, rate a second, that come in clumps over a smooth rub; rms 1."""
    hits = rng.random(N) < rate / SR
    size = amp(spread_db * np.minimum(rng.standard_normal(N), 2)) * np.sign(rng.standard_normal(N))
    rub = smooth * rng.standard_normal(N)
    return unit((unit(hits * size) + rub) * amp(clump_db * wobble(110)))


def flakes(rate, t60):
    """Sparse little breaks, each a short spray; rms 1."""
    breaks = grains(rate, spread_db=10.5, clump_db=-1.5, smooth=0)
    return unit(signal.oaconvolve(breaks, burst(t60, scatter=0.75))[:N])


def patchy(x, depth_db):
    """Every crumb has its own colour: gain varies over short patches of time and frequency; rms 1."""
    z = signal.stft(x, nperseg=256)[2]
    field = uniform_filter1d(rng.standard_normal(z.shape), size=11, axis=0)
    field = uniform_filter1d(field, size=3, axis=1)
    return unit(signal.istft(z * amp(depth_db * unit(field)), nperseg=256)[1][:N])


def swell(length, attack, t60):
    """Gain that rises, holds until length is over and dies away."""
    t = np.arange(round((length + t60) * SR)) / SR
    return np.minimum(t / attack, 1) * amp(-60 * np.maximum(t - length, 0) / t60)


def wobble(rate):
    """A random curve of straight lines, rate knots a second."""
    knots = rng.standard_normal(int(N * rate / SR) + 4)
    return map_coordinates(knots, [np.arange(N) * rate / SR], order=1)


def resonance(f, hz, width):
    """Complex response of one band-pass resonance."""
    return 1j * f * width / (hz * hz - f * f + 1j * f * width)


def causal(gain):
    """The minimum-phase response with this gain: nothing sounds before the blow."""
    cepstrum = irfft(np.log(np.maximum(gain, 1e-6)))
    half = len(cepstrum) // 2
    # fold negative time onto positive time
    cepstrum[1:half] *= 2
    cepstrum[half + 1:] = 0
    return np.exp(rfft(cepstrum))


def filtered(x, response):
    """x times a complex response of frequency."""
    n = x.shape[-1]
    m = 2 * next_fast_len(n // 2 + 2048)
    return irfft(rfft(x, m) * response(np.fft.rfftfreq(m, 1 / SR)), m)[..., :n]


def coloured(x, spectrum):
    """x through a (Hz, dB) spectrum."""
    return filtered(x, lambda f: causal(amp(along(spectrum, f))))


def along(points, hz):
    """(Hz, value) points read on a log frequency axis."""
    f, v = np.transpose(points)
    return np.interp(np.log(hz + 1), np.log(f + 1), v)


def amp(db):
    """Decibels to gain."""
    return 10 ** (np.asarray(db) / 20)


def unit(x):
    """x at rms 1."""
    return x / np.sqrt(np.mean(x ** 2) + 1e-20)


def sized(x, db, seconds):
    """x with the energy of a sound that holds db for that long."""
    return x / np.linalg.norm(x) * amp(db) * np.sqrt(seconds * SR)


def add(track, s, x):
    """Mix the rows of x into those of the track at time s."""
    start = max(round(s * SR), 0)
    track[:, start:start + x.shape[1]] += x[:, :N - start]


def scene():
    """The left microphone hears everything with a phase lag, and most of the spectrum weaker."""
    # left microphone against the right: (frequency [Hz], gain [dB])
    left_level = [(60, -.5), (200, -2.5), (400, -5.5), (680, -6), (950, 0), (1450, 0), (2000, -5.5),
                  (3200, -10), (4800, -6.5), (8000, -6.5), (11000, -1.5), (15000, 0)]
    # left microphone against the right: (frequency [Hz], phase [rad])
    left_phase = [(40, 0), (340, -.6), (520, -1.2), (700, -2.4), (950, -3.2), (1250, -3.2), (1800, -3.7),
                  (2600, -5.1), (3000, -6.6), (3700, -9.8), (4800, -12.5), (16000, -12.6)]

    def left_microphone(f):
        return amp(along(left_level, f)) * np.exp(1j * along(left_phase, f))

    left, right = snaps() + chips() + thuds() + bumps() + crumbling() + dust() + background()
    return np.array([filtered(left, left_microphone), right])


def record(dry):
    """The loudest cracks flatten towards full scale; a steep filter then cuts the top of the band."""
    top_hz = 15750
    clipped = dry / (1 + np.abs(dry) ** 6) ** (1 / 6)
    return filtered(clipped, lambda f: 1 / np.sqrt(1 + (f / top_hz) ** 160))


dry = scene()
out = record(dry)
generate_wav(out)
```